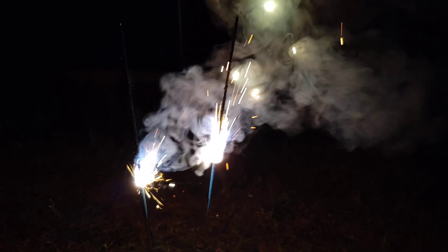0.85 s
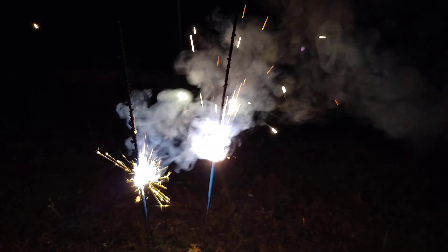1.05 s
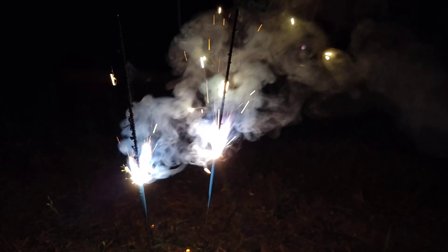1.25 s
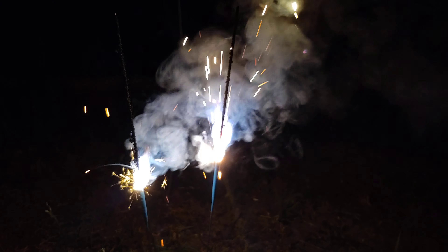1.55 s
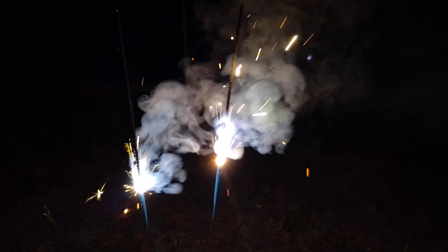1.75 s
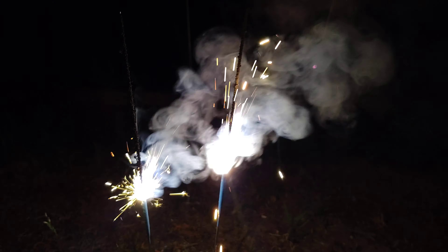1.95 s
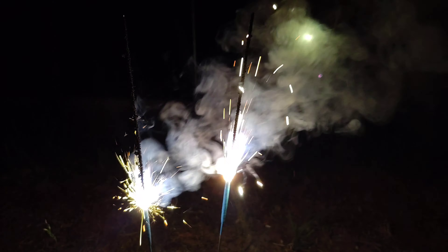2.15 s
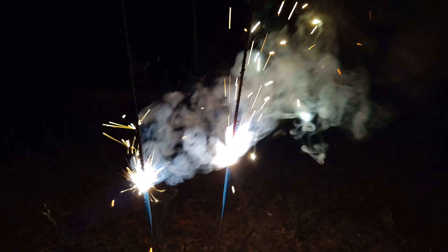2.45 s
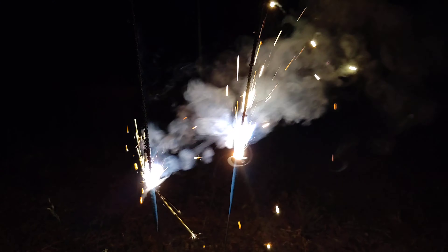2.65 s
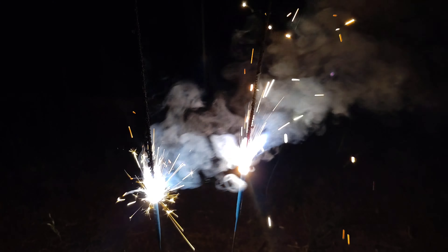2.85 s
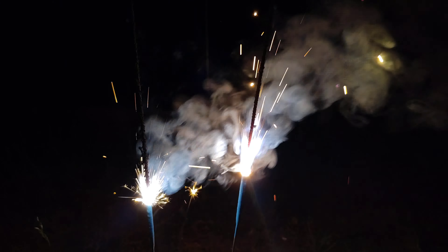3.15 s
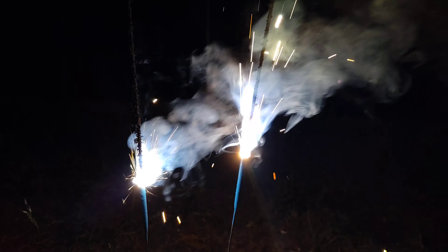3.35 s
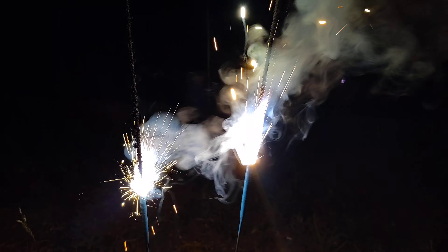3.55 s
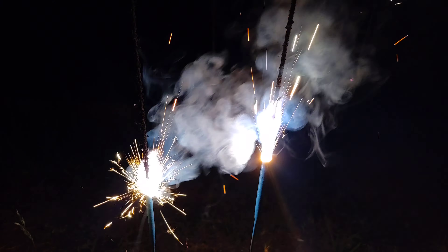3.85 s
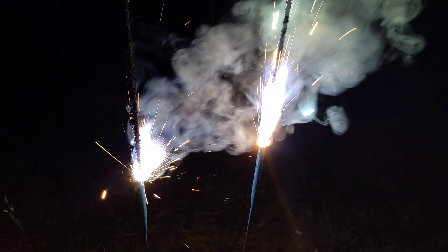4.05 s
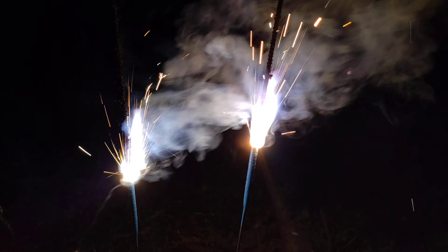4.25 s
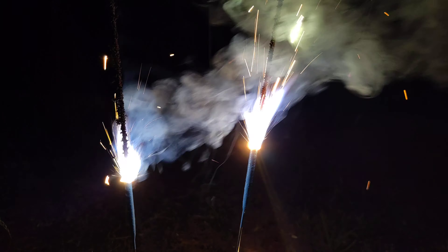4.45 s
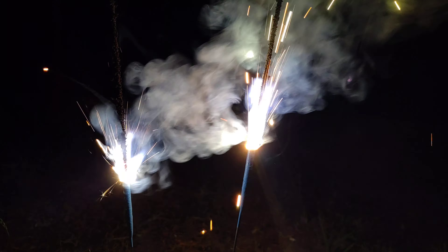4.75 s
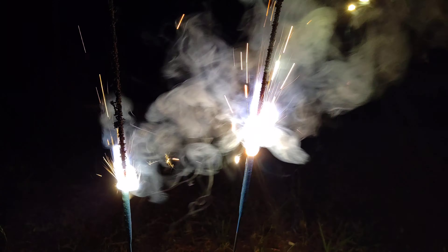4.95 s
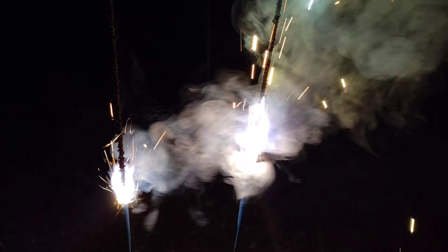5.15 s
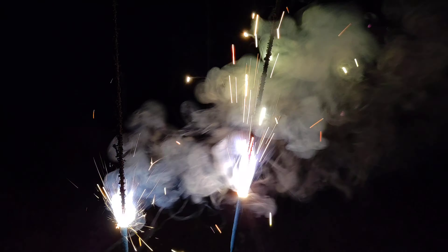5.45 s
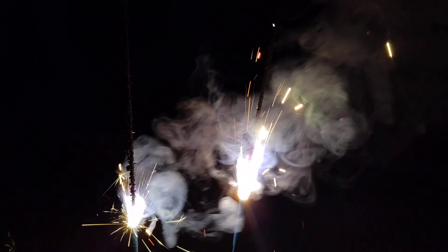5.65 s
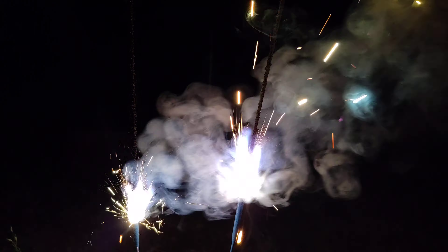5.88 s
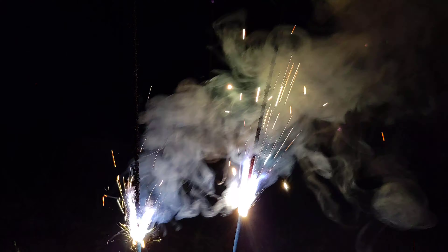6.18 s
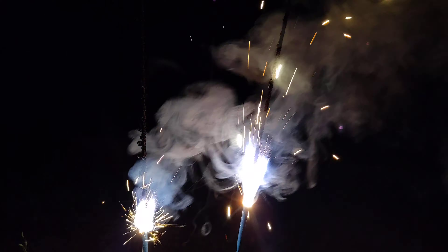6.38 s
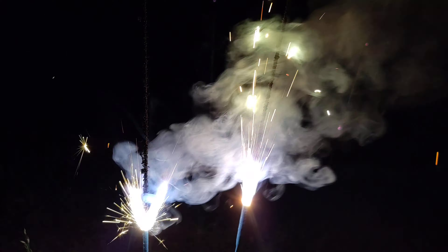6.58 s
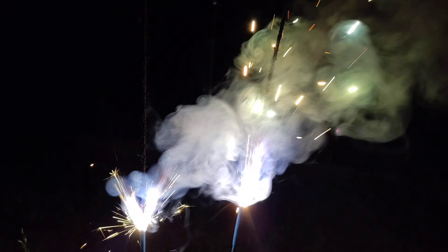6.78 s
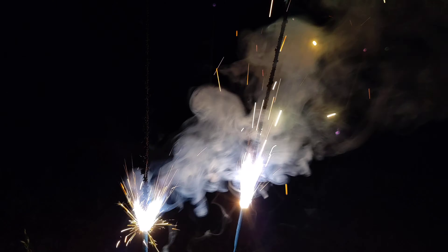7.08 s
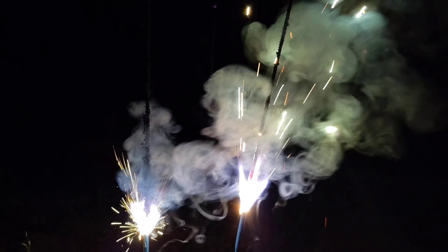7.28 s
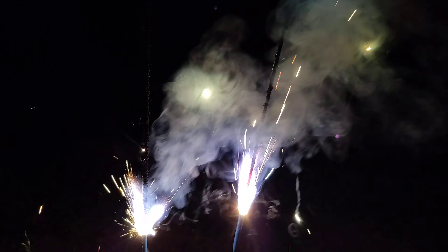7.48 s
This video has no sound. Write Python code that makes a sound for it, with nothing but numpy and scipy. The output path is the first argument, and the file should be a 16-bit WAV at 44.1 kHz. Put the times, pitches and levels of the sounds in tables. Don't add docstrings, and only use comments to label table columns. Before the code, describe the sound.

Two sparklers fizz brightly outdoors at night, a continuous flickering hiss with scattered snaps and soft pops, surging louder around the middle.

```python
import sys
import numpy as np
from scipy import signal
from scipy.fft import rfft, irfft
from scipy.io import wavfile
from scipy.ndimage import uniform_filter1d

SR = 44100
rng = np.random.default_rng(int(sys.argv[2]) if len(sys.argv) > 2 else 0)


def gain_from_decibels(decibels):
    exponent = np.asarray(decibels, float) / 20
    return 10 ** exponent


def persist_wave(psi):
    counts = np.round(np.clip(psi, -1, 1) * 32767).astype(np.int16)
    wavfile.write(sys.argv[1], SR, np.atleast_2d(counts).T)


N = 336042
TIME = np.arange(N) / SR

# (time [s], strength [dB], gas against sparks [dB])
BURN = [(0, -40.5, -2), (.6, -39.5, -2), (1.3, -39, -3), (2.3, -42, 0), (3.1, -41.5, .5), (3.6, -38, -0.5),
        (4.0, -38, 1.5), (4.35, -34, 0.5), (5.0, -35.5, 0.5), (5.35, -39.5, 2), (5.7, -41, 2.5),
        (6.1, -36.5, 0), (6.35, -39, 2.5), (6.6, -39.5, -0.5), (7.1, -39.5, -.5), (7.62, -37.5, -.5)]
# (time [s], swing [dB], half length [s])
FLARES = [(0.304, 2.1, 0.014), (0.585, 1.5, 0.015), (1.1, 2, 0.013), (2.086, 3, 0.0099),
          (2.267, 3.5, 0.0084), (2.67, 3.5, 0.045), (4.104, 4.5, 0.03), (4.586, 1, 0.011),
          (4.772, 1.7, 0.045), (4.87, 1, 0.015), (5.202, 5, 0.019), (5.544, 2, 0.038), (6.034, 3, 0.022),
          (6.316, 3, 0.022), (6.452, 4, 0.027), (6.657, 1, 0.015), (6.702, 3.5, 0.032), (6.907, 4, 0.015),
          (7.013, 2, 0.024), (7.45, 2, 0.025)]
# (time [s], swing [dB], half length [s])
LULLS = [(0.154, -3, 0.053), (0.437, -3, 0.058), (0.83, -4, 0.03), (0.97, -4.5, 0.028), (1.404, -1, 0.015),
         (1.514, -4, 0.013), (1.65, -2, 0.018), (1.917, -2.2, 0.045), (2.33, -4.0, 0.019),
         (2.442, -0.5, 0.012), (2.781, -4, 0.012), (3.125, -2, 0.022), (3.361, -5, 0.013),
         (3.552, -3.5, 0.023), (3.617, -2.5, 0.016), (3.817, -1, 0.011), (4.222, -1.4, 0.049),
         (4.43, -1.5, 0.013), (5.69, -2.0, 0.015), (5.744, -5.5, 0.016), (6.203, -1.3, 0.028),
         (6.536, -1.3, 0.013), (7.136, -0.5, 0.02), (7.526, -2.2, 0.019)]
# (time [s], extra right lag near 7 kHz [samples], same near 13 kHz [samples], tilt down [0-1])
AIM = [(0, -0.85, 0.12, 0), (.5, -1.06, -0.23, 0), (1.7, -0.79, -0.045, .05), (2.3, -0.61, -0.24, 0.34),
       (2.8, -1.05, -.42, 0.2), (3.3, -0.62, -.4, .3), (3.6, -.24, -0.22, .35), (4.0, -0.12, -.55, 0.35),
       (4.4, 0.38, -.1, 0.7), (4.8, 0.38, -0.07, 0.77), (5.6, .34, .12, 1), (6.0, -0.2, -0.18, 0.9),
       (6.4, -0.17, -.18, 0.87), (7.1, -0.39, -0.19, 0.83), (7.62, -.68, -0.35, 0.8)]
# (time [s], level [dB], relative level of the dull echo [dB])
SNAPS = [(0.2194, -21, -21), (2.0855, -25, -25), (2.7006, -22, -17), (2.7021, -25, -17), (2.7034, -22, -12),
         (2.705, -25, -12), (4.2296, -15.5, -7), (4.8494, -23.5, -15), (5.1994, -28, -18),
         (6.9854, -33, -21), (7.0089, -16, -23), (7.4296, -24, -19)]
# (frequency [Hz], width [Hz])
BODY_RINGS = [
    (7500, 300),
    (10950, 150),
    (13720, 170),
    (15550, 250),
]
# (level [dB], slope [dB per unit])
RING_LAWS = [
    (-1.5, 12.5),
    (-1, 12),
    (10.5, 20.0),
    (6, 18),
]
# (frequency [Hz], width [Hz], level [dB], slope [dB per sample of extra lag])
SHARED_HOLLOW = (5200, 170, -1.5, 3.5)
# (frequency [Hz], width [Hz], level [dB], slope [dB per sample of extra lag])
RIGHT_HOLLOWS = [
    (6500, 120, -2.0, 2.5),
    (12500, 600, 1.5, 3),
]
# (frequency [Hz], phase [rad])
BODY_PHASE = [(100, 0.15), (1100, 1.19), (2100, 2.06), (2900, 0.93), (3600, 1.26), (4300, 0.21),
              (5500, 0.84), (6200, 0.29), (7000, 0.63), (8000, -0.55), (9000, -1.19), (11000, -2.3),
              (13000, -3.05), (15000, -5.79)]
# (frequency [Hz], early [0-1], late [0-1])
LIKENESS = [(300, .96, .95), (1500, .96, .91), (2300, .82, .7), (3700, .56, .46), (4400, .74, .68),
            (5100, .5, .7), (6400, .74, .86), (7150, .96, .97), (7800, .62, .48), (9200, .72, .84),
            (11500, .88, .35), (13200, .4, .92), (14200, .8, .65), (15600, .45, .55)]
# (frequency [Hz], level [dB])
LEFT_PORT = [(800, -22), (1250, -17), (1800, -21.5), (2300, -20), (4300, -16), (5200, -16), (5900, -13),
             (6900, -10), (7500, -9.5), (9000, -13), (10000, -13.2), (12000, -13.5), (13300, -11),
             (15600, -9.3)]
# (frequency [Hz], level [dB])
RIGHT_PORT = [(1250, -19.5), (1850, -18), (2580, -4), (3300, -10), (3950, -5), (5100, -20.5), (6030, -11.5),
              (6500, -16.5), (7800, -7.5), (9200, -0.5), (11200, -5), (12600, -14.6), (13800, -12),
              (15600, -15.5)]
# (frequency [Hz], level [dB per Hz])
FLUTTER_ASIDE = [(21, -49), (35, -25), (90, -4), (119, -2), (246, -3.5), (295, -4), (503, -12.5),
                 (587, -13), (647, -10.5), (734, -7.5), (1000, -12.5), (1300, -32), (2200, -120)]
# (frequency [Hz], level [dB per Hz])
FLUTTER_CLOSER = [(21, -53), (35, -37), (67, -9.5), (119, -1.5), (264, -6), (299, -1.5), (321, -10),
                  (359, -3), (443, -12), (579, -6), (788, -14.5), (1000, -13), (1300, -22), (2200, -120)]
# (time [s], level [dB], frequency [Hz], length [s])
PUFFS = [(0.327, -47, 103, 0.025), (0.629, -65, 223, 0.02), (0.659, -49, 114, 0.02),
         (1.08, -37, 170, 0.008), (1.901, -43, 218, 0.017), (2.629, -47, 132, 0.019),
         (3.166, -47, 307, 0.014), (3.484, -49, 252, 0.022), (3.891, -52, 102, 0.02),
         (3.963, -49, 247, 0.016), (4.689, -41, 116, 0.018), (4.769, -41, 262, 0.015),
         (5.074, -37, 133, 0.023), (5.183, -51, 302, 0.028), (5.893, -45, 306, 0.022),
         (5.994, -43, 132, 0.02), (7.278, -47, 353, 0.023)]
# (time [s], level [dB], length [s])
POPS = [(.6655, -31, .0002), (1.0835, -36, 0.00023), (1.9085, -32, 0.00022), (3.908, -29, .0002),
        (4.772, -31, .0003), (5.0785, -26, .00015), (5.92, -32, .0002)]
# (frequency [Hz], level [dB])
HUM = [
    (119, -83.5),
    (296.1, -73),
    (356, -78.5),
    (592.2, -82),
]

PORT_LAG = 10
CALM_DB = -41.5
BODY_SHARE, FINE_SHARE, LOW_SHARE = 0.63, 0.94, 0.61


def evened(x):
    return x / np.sqrt(np.mean(np.abs(x) ** 2) + 1e-20)


def read(points, hz):
    f, *values = np.transpose(points)
    return np.squeeze([np.interp(np.log(hz + 1), np.log(f + 1), v) for v in values])


def curves(rows, t):
    s, *columns = np.transpose(rows)
    return [np.interp(t, s, c) for c in columns]


def wander(low_hz, top_hz):
    band = signal.butter(1, [low_hz, top_hz], "band", fs=SR, output="sos")
    return evened(signal.sosfilt(band, rng.standard_normal(N)))


def resonance(f, centre, width):
    return 1 / (1 + ((f - centre) / width) ** 2)


def fire(t):
    quick = np.zeros(len(t))
    for s, db, half in FLARES + LULLS:
        near = slice(*np.searchsorted(t, [s - .25, s + .25]))
        quick[near] += db * np.exp(-.5 * ((t[near] - s) / half) ** 2)
    slow, gas = curves(BURN, t)
    return slow, quick, gas


def sparks(per_s, spread_db):
    size = gain_from_decibels(spread_db * np.minimum(rng.exponential(1, N), 5))
    sign = np.sign(rng.standard_normal(N))
    return evened(size * sign * (rng.random(N) < per_s / SR))


def snap(jets):
    dull = signal.windows.hann(9)
    decay = np.exp(-np.arange(60) / SR / 0.00058)
    crackles = rng.choice([-1., 1.], (len(SNAPS), 60)) * decay
    for (s, db, low_db), crackle in zip(SNAPS, crackles):
        at = round(s * SR) + 55
        jets[:, at:at + 60] += gain_from_decibels(db - 7.0) * crackle
        jets[:, at + 50:at + 59] -= gain_from_decibels(db + low_db - 3.5) * dull


def flames():
    slow_db, quick_db, _ = fire(TIME)
    sputter_db = .35 * wander(4, 14) + 0.8 * wander(7.8, 250)
    jets = np.array([rng.standard_normal(N) + 0.4 * sparks(2500, 2.3) for _ in range(2)])
    jets = evened(jets) * gain_from_decibels(slow_db + quick_db + sputter_db)
    snap(jets)
    return jets


def body_resonance(f, low_lag, top_lag, tilt):
    facing = np.maximum(low_lag, 0)
    controls = (tilt, facing, top_lag, facing + 2 * np.minimum(top_lag + 0.33, 0))
    gain_db = 0
    for (centre, width), (db, slope), control in zip(BODY_RINGS, RING_LAWS, controls):
        gain_db = gain_db + (db + slope * control) * resonance(f, centre, width) ** 1.2
    centre, width, db, slope = SHARED_HOLLOW
    gain_db += (db + slope * low_lag) * resonance(f, centre + 300 * top_lag, width)
    gain_db += 2.0 * (tilt - 2 * facing) * resonance(f, 14900, 500)
    gain_db -= 1.3 * np.minimum(low_lag, 0) * resonance(f, 6300, 400)
    gain_db -= 3.65 * (1 - np.tanh((f - 1000) / 150))
    return gain_db


def spark_bands(f, t, tilt):
    _, quick_db, gas_db = fire(t)
    fine_own = np.interp(t, TIME, wander(3.0, 16.0))
    core_own = np.interp(t, TIME, wander(3.0, 30.0))
    body_db = -0.42 + gas_db - (1 - BODY_SHARE) * quick_db
    fine_db = -1.0 + 0.7 * fine_own - 2.8 * tilt - (1 - FINE_SHARE) * quick_db
    gain_db = body_db / (1 + (f / 6200) ** 8)
    gain_db += fine_db / (1 + (12300 / (f + 1)) ** 12)
    gain_db += 1.0 * core_own / (1 + ((f - 9200) / 2300) ** 4)
    return gain_db


def fizz():
    hz, t, (a, b) = signal.stft(flames(), SR, nperseg=512, noverlap=384)
    f = hz[:, None]
    low_lag, top_lag, tilt = curves(AIM, t)
    slow_db = fire(t)[0]
    shared_db = body_resonance(f, low_lag, top_lag, tilt) + spark_bands(f, t, tilt)
    patches = rng.standard_normal(a.shape)
    patches = evened(uniform_filter1d(uniform_filter1d(patches, 9, 0), 24, 1))
    late = np.clip(0.18 + 1.3 * tilt, 0, .95)
    early_same, late_same = read(LIKENESS, hz)[:, :, None]
    same = np.clip(early_same + late * (late_same - early_same), 0, 1)
    lag = low_lag + (top_lag - low_lag) * np.clip((f - 8000) / 4500, 0, 1)
    phase = np.interp(f, *np.transpose(BODY_PHASE)) - 2 * np.pi * f * (PORT_LAG + lag) / SR
    left_db = -0.6 - 0.25 * (slow_db - CALM_DB) + 1.5 * tilt
    left = (same * a + np.sqrt(1 - same ** 2) * b) / np.exp(1j * phase)
    left = left * gain_from_decibels(read(LEFT_PORT, hz)[:, None] + left_db)
    right_db = read(RIGHT_PORT, hz)[:, None]
    for centre, width, db, slope in RIGHT_HOLLOWS:
        right_db = right_db + (db + slope * low_lag) * resonance(f, centre, width)
    ports = np.array([left, a * gain_from_decibels(right_db)]) * gain_from_decibels(shared_db + 0.79 * patches + 14.5)
    ports *= f ** 4 / (f ** 4 + 600.0 ** 4)
    return signal.istft(ports, nperseg=512, noverlap=384)[1][:, :N]


def flutter():
    hz = np.fft.rfftfreq(N, 1 / SR)
    noise = rfft(rng.standard_normal((2, N)))
    aside = evened(irfft(noise * gain_from_decibels(read(FLUTTER_ASIDE, hz)), N))
    closer = evened(irfft(noise * gain_from_decibels(read(FLUTTER_CLOSER, hz)), N))
    turned = np.clip((curves(AIM, TIME)[0] + .5) / .7, 0, 1)
    a, b = aside + turned * (closer - aside)
    slow_db, quick_db, gas_db = fire(TIME)
    level_db = -64 + 0.68 * (slow_db - CALM_DB) + LOW_SHARE * quick_db + 1.2 * gas_db
    level_db += 2.0 * wander(6.1, 55)
    return np.array([a + 0.2 * b, a - .19 * b]) * gain_from_decibels(level_db)


def puffs():
    out, t = np.zeros(N + 4000), np.arange(4000) / SR
    rushes = signal.lfilter([1], [1, -.85], rng.standard_normal((len(PUFFS), 4000)))
    for (s, db, hz, length), rush in zip(PUFFS, rushes):
        u = t / length
        push = -np.sin(2 * np.pi * hz * t) + 0.88 * rush * np.exp(-2.5 * u)
        swell = u * np.exp(-2.2 * u) * 2.7
        out[round(s * SR):][:4000] += gain_from_decibels(db - 6.0) * push * swell
    return out[:N]


def pops():
    out = np.zeros(N)
    for s, db, length in POPS:
        u = np.arange(800) / SR / length
        onset = np.minimum(u * 8, 1)
        out[round(s * SR):][:800] -= gain_from_decibels(db) * (1 - u) * np.exp(-u) * onset
    return out


def hum():
    out = np.zeros(N)
    for hz, db in HUM:
        waver = 1.2 * uniform_filter1d(wander(.3, 3), 4000)
        out += gain_from_decibels(db + 3 + waver) * np.sin(2 * np.pi * hz * TIME + .3 * waver)
    return out


def scene():
    return fizz() + flutter() + puffs() + pops() + hum()


def low_pass(x):
    return signal.sosfilt(signal.butter(12, 17070, fs=SR, output="sos"), x)


def record(dry):
    low_cut = signal.butter(2, 48.0, "high", fs=SR, output="sos")
    edge = signal.firwin(511, 15760, window=("kaiser", 9), fs=SR)[None]
    mix = signal.oaconvolve(signal.sosfilt(low_cut, dry), edge, "same")
    return low_pass(mix)


dry = scene()
out = record(dry)
persist_wave(out)
```